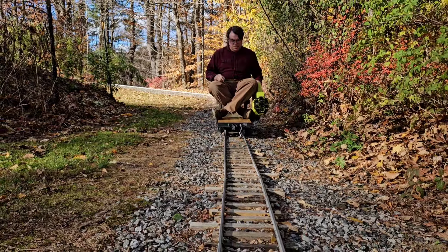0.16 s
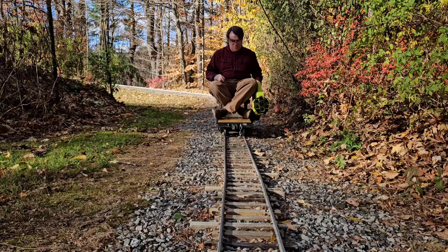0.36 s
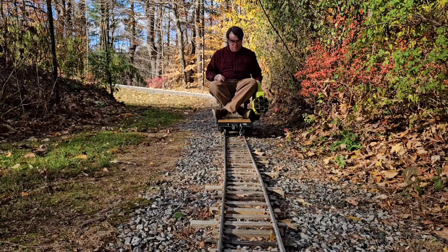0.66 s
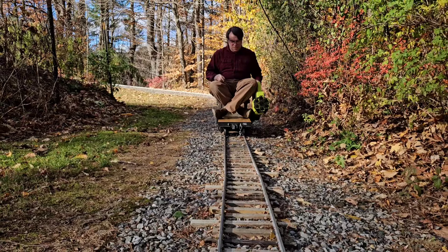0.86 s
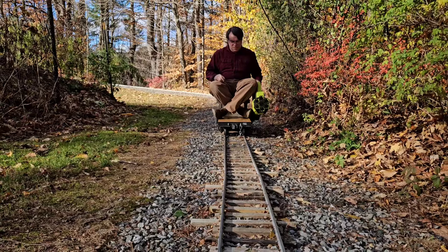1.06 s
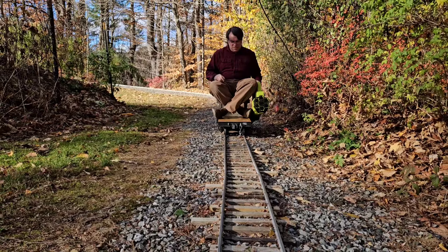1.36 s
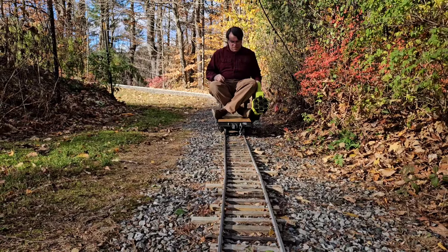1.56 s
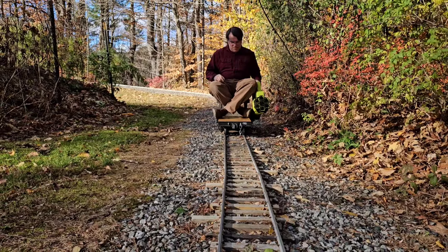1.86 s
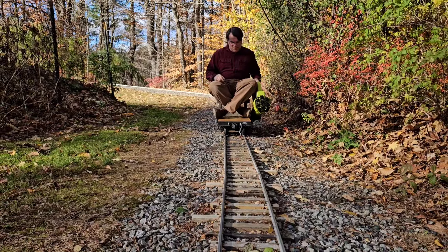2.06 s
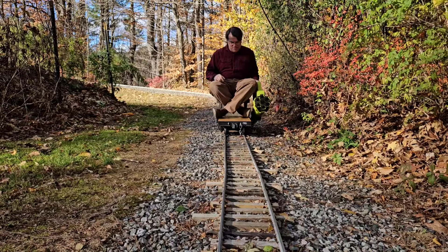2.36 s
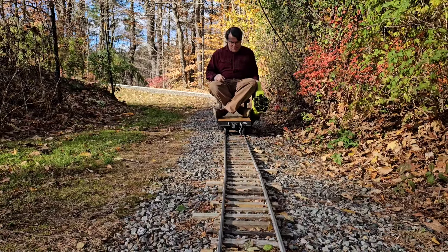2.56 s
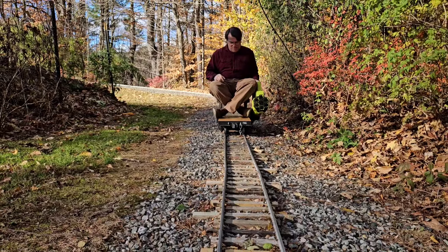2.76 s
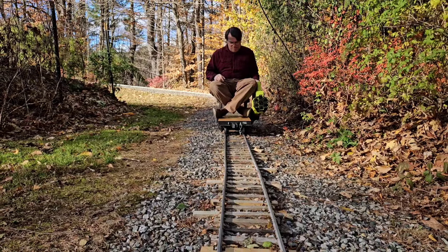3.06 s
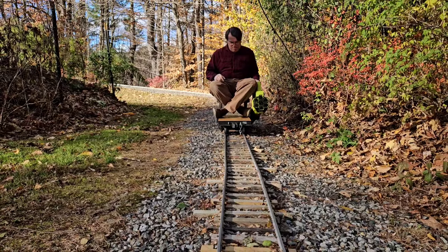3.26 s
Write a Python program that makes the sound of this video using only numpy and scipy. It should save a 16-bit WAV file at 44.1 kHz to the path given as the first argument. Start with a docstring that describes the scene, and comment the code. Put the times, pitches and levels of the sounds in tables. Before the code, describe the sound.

A battery leaf blower runs at full speed some metres away outdoors, humming and whining over rushing air. Its pitch sags briefly, then recovers with a light tick. A breeze rumbles and knocks dully on the microphone.

```python
"""A battery leaf blower, some metres from a stereo microphone, pushes a small rail cart along a garden track.
It runs flat out from the start: shaft hum and blade whine over rushing air with one early reflection.
A breeze rumbles on the microphone throughout and knocks dully on the left port near 1 s.
At 2 s the rotor sags; half a second later it is back up to speed and the cart gives one light tick.
Near 3 s the breeze knocks a few more times."""
import sys
import numpy as np
from scipy import signal
from scipy.fft import rfft, irfft
from scipy.io import wavfile

SR = 44100
rng = np.random.default_rng(int(sys.argv[2]) if len(sys.argv) > 2 else 0)


def generate_wav(sig):
    """Save sig (samples, or channels by samples) to the path in sys.argv[1] as 16-bit PCM at SR."""
    pcm = np.round(np.clip(np.atleast_2d(sig).T, -1, 1) * 32767).astype(np.int16)
    wavfile.write(sys.argv[1], SR, pcm)


N = 149940
FULL_HZ, SAG_HZ = 344, 23  # shaft rate flat out, and its drop in a full sag
BIN_HZ = np.arange(N // 2 + 1) * SR / N


def undb(db):
    """Decibels to gain."""
    return 10 ** (np.asarray(db) / 20)


def curve(table, column=1):
    """One column of a time table, joined by straight lines."""
    rows = np.array(table, float)
    return np.interp(np.arange(N) / SR, rows[:, 0], rows[:, column])


def across(table, hz):
    """A frequency table read on a log axis."""
    rows = np.array(table, float)
    return np.interp(np.log(hz + 1), np.log(rows[:, 0] + 1), rows[:, 1])


def unit(x):
    """Scale to rms 1."""
    return x / np.sqrt(np.mean(x ** 2))


def walk(rate_hz):
    """Smooth random drift with rms 1 and about `rate_hz` new values a second."""
    return unit(irfft(rfft(rng.standard_normal(N)) / (1 + (2 * BIN_HZ / rate_hz) ** 2), N))


def ports(hz):
    """Complex gain from the track to the microphone's left and right ports."""
    # level of the left port over the right: frequency_hz, excess_db
    balance = [(300, -1.2), (1300, 1.2), (2400, .6), (4000, 0.8), (6500, 1.5), (7500, 3), (8700, -6),
               (10500, 2.5), (15000, 0.5)]
    # phase of the left port against the right: frequency_hz, lead_rad
    phase = [(0, 0), (1800, 0), (2580, -.15), (3450, -.5), (3790, -.25), (4200, -.6), (6290, -1.3),
             (8440, -3.2), (10300, -2), (14000, -3.6), (15500, -3.9)]
    left = undb(across(balance, hz) / 2) * np.exp(.5j * across(phase, hz))
    return np.array([left, 1 / left])


def breeze():
    """Low eddies rumble right on the microphone, different on each port."""
    # spectrum of the eddies: frequency_hz, relative_db
    spectrum = [(15, -27), (30, -9), (45, 5), (90, -6), (130, -8.5), (185, -6), (300, -24), (600, -46),
                (1500, -57)]
    # gusts on the ports: time_s, left_db, right_db
    gusts = [(0, -41, -34.5), (.32, -29.5, -36.5), (.48, -41.5, -38), (.62, -43, -34.5), (.78, -33, -36),
             (.86, -50, -58), (1.02, -44, -52), (1.11, -46, -32.5), (1.35, -33.5, -58), (1.52, -50, -34),
             (1.67, -36, -34.5), (1.85, -40, -37), (1.98, -37, -31), (2.12, -44, -35), (2.3, -39, -44),
             (2.44, -40, -31), (2.62, -44, -43), (2.88, -55, -53), (3.03, -30, -42), (3.2, -49, -58),
             (3.33, -47, -35), (3.4, -52, -49)]
    eddies = unit(irfft(rfft(rng.standard_normal((2, N))) * undb(across(spectrum, BIN_HZ)), N))
    return eddies * undb(np.array([curve(gusts, column=1), curve(gusts, column=2)]))


def wind_knocks():
    """The breeze hits the left port alone: each knock is a push of pressure between two suctions."""
    # pushes of pressure: centre_s, level_db, half_width_ms
    pushes = [(.9527, -18, 1.05), (.9985, -13, 1.05), (2.9575, -19, 1.3), (2.9962, -7, .6),
              (3.0205, -15, 1.2), (3.0325, -18, 2.8), (3.044, -11.5, 1.1), (3.0555, -20, 1.1)]
    lag, spread = 2.1, 0.77  # of the suctions, in half widths of the push
    early_share = 0.56
    t, left = np.arange(N) / SR, np.zeros(N)
    for centre_s, level_db, half_width_ms in pushes:
        offset = (t - centre_s) * 1000 / half_width_ms
        push = np.exp(-offset ** 2 / 2)
        before = np.exp(-((offset + lag) / spread) ** 2 / 2) / spread
        after = np.exp(-((offset - lag) / spread) ** 2 / 2) / spread
        left += undb(level_db) * (push - early_share * before - (1 - early_share) * after)
    return np.array([left, np.zeros(N)])


def cart_tick(start_s=2.4795, peak_db=-22, ring_hz=5200, width_hz=1400, decay_s=.0012):
    """One light contact on the cart: a very short burst through a bright resonance."""
    age = np.arange(N) / SR - start_s
    burst = rng.standard_normal(N) * (age >= 0) * np.exp(-np.abs(age) / decay_s)
    resonance = 1 / (1 + 2j * (BIN_HZ - ring_hz) / width_hz)
    ring = irfft(rfft(burst) * resonance * ports(BIN_HZ), N)
    return undb(peak_db) * ring / np.abs(ring).max()


def air_rush(sag, level_db=-29.5, flicker_db=.5, hiss_hz=3800, hiss_sag_db=-2.5):
    """Turbulent air, coloured by the tube and combed by a reflection; its hiss weakens in the sag."""
    # air through the fan and nozzle: frequency_hz, relative_db
    spectrum = [(60, -26.5), (150, -7), (270, -11.5), (400, 0.5), (460, -7), (520, -16), (640, -8),
                (730, -28), (840, -17), (930, -22.5), (1050, -11.5), (1330, -11), (1460, -16.5),
                (1700, -12.5), (2100, -7.5), (2320, -5.5), (2480, -10), (2950, -12), (3350, -8),
                (3700, -11), (4400, -15), (5000, -21.5), (6000, -24.5), (6900, -26), (7400, -21.5),
                (7900, -26), (9000, -26), (9800, -29.5), (11400, -24.5), (15600, -23)]
    # part of the rush that reaches the two ports unrelated: frequency_hz, power_share
    diffuse = [(100, 0.17), (300, 0.01), (800, 0.24), (1400, 0.027), (2500, 0.052), (4000, 0.49),
               (6000, 0.19), (9000, 0.34), (15000, 0.2)]
    echo_s, echo_gain = .00397, 0.19
    noise = rfft(rng.standard_normal((3, N)))
    share = np.clip(across(diffuse, BIN_HZ), 0, 1)
    turbulence = np.sqrt(1 - share) * noise[0] + np.sqrt(share) * noise[1:]
    reflection = echo_gain * np.exp(-2j * np.pi * BIN_HZ * echo_s)
    air = turbulence * ports(BIN_HZ) * undb(across(spectrum, BIN_HZ)) * (1 + reflection)
    treble = 1 / (1 + (hiss_hz / (BIN_HZ + 1)) ** 8)
    body = irfft(air * (1 - treble), N) * undb(flicker_db * walk(rate_hz=16))
    hiss = irfft(air * treble, N) * undb(hiss_sag_db * sag + flicker_db * walk(rate_hz=19))
    return undb(level_db) * unit(body + hiss)


def shaft_tone(turns, order, level_db, flutter, flutter_hz=25, shiver_hz=98, shiver_share=0.46):
    """One multiple of the shaft rate; uneven inflow makes its strength and phase flutter."""
    sway = walk(flutter_hz) + 1j * walk(flutter_hz)
    shiver = walk(shiver_hz) + 1j * walk(shiver_hz)
    amplitude = undb(level_db) * (1 + flutter * (sway + shiver_share * shiver))
    wave = amplitude * np.exp(2j * np.pi * (order * turns + rng.random()))
    return np.sqrt(2) * (ports(np.array([order * FULL_HZ])) * wave).real


def rotor(speed_hz, sag, blades=11, wobble=.0006):
    """Hum of the shaft orders and whine of the blades, all locked to one turning angle."""
    # tones of the hum: shaft_order, level_db, sag_change_db, flutter_share
    orders = [(1, -25.5, -0.5, 0.073), (2, -45, -2.5, 0.095), (3, -37.5, -15, 0.043), (4, -43.5, 6, 0.17),
              (5, -49.5, -1, .25), (6, -49, -8, 0.62), (8, -54.5, -9, .5), (9, -54.5, 6, 0.31),
              (14, -62, -3, .4), (22, -54, 5, 0.56)]
    # strength of the blade whine: time_s, level_db
    whine_levels = [(0, -36.5), (.7, -35.5), (1.5, -35.5), (1.8, -32.5), (2.03, -35), (2.25, -32.5),
                    (2.37, -35.5), (2.46, -28), (2.6, -32.5), (2.95, -33), (3.4, -36)]
    turns = np.cumsum(speed_hz * (1 + wobble * walk(rate_hz=8.6))) / SR
    hum = sum(shaft_tone(turns, order, level_db + sag_change_db * sag, flutter)
              for order, level_db, sag_change_db, flutter in orders)
    whine = shaft_tone(turns, blades, curve(whine_levels), flutter=0.14)
    return hum + whine


def scene():
    """The blower and its cart some metres off, the breeze on the microphone itself."""
    # speed of the rotor: time_s, shaft_hz
    shaft_speed = [(0, 344.4), (1.1, 344), (1.6, 343.4), (1.94, 343.2), (2.0, 336.6), (2.1, 327),
                   (2.2, 323.2), (2.31, 320.4), (2.35, 327), (2.41, 338.8), (2.48, 342.4), (2.7, 342.8),
                   (3.4, 342.5)]
    speed_hz = curve(shaft_speed)
    sag = np.clip((FULL_HZ - speed_hz) / SAG_HZ, 0, 1)  # 0 flat out, 1 at the bottom of the sag
    return rotor(speed_hz, sag) + air_rush(sag) + cart_tick() + breeze() + wind_knocks()


def record(dry):
    """The recorder cuts the top treble steeply."""
    top_hz = 15650
    return signal.sosfilt(signal.ellip(12, .1, 80, top_hz, fs=SR, output="sos"), dry)


dry = scene()
out = record(dry)
generate_wav(out)
```